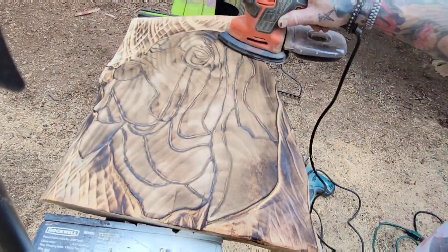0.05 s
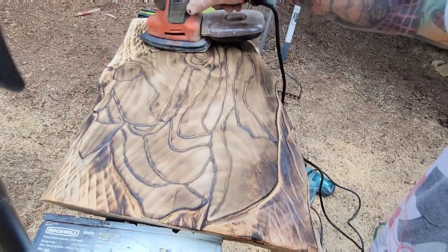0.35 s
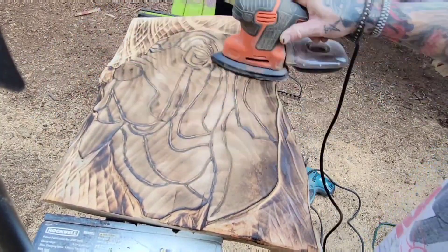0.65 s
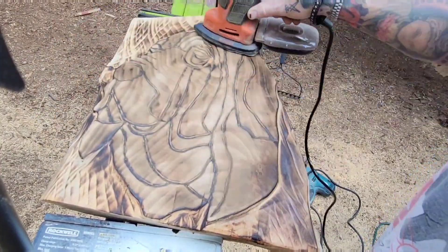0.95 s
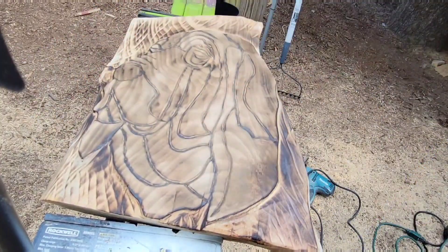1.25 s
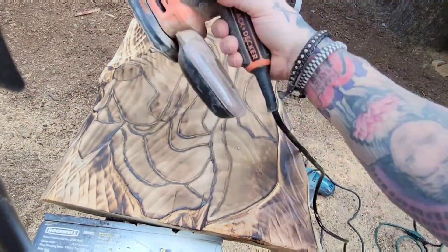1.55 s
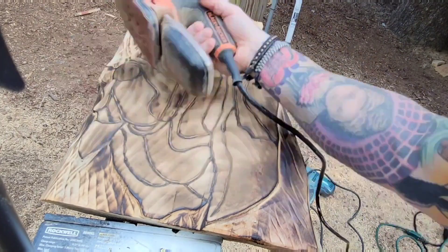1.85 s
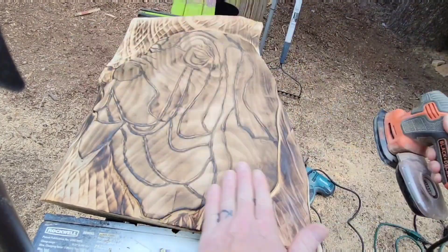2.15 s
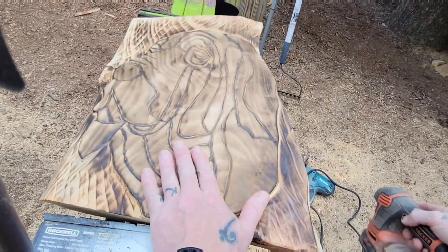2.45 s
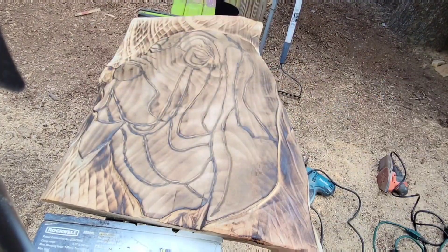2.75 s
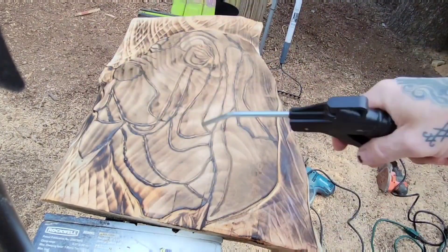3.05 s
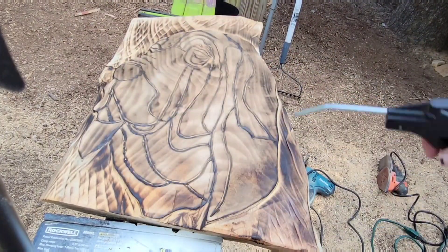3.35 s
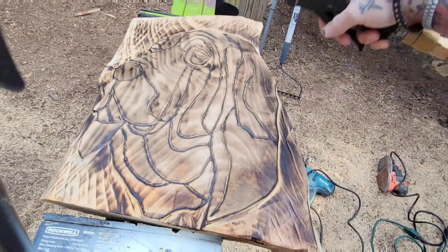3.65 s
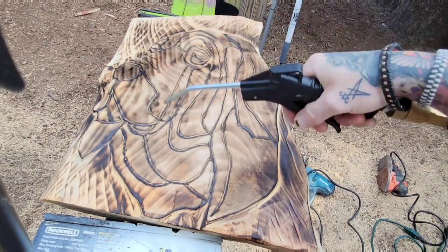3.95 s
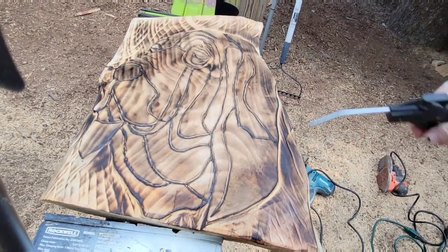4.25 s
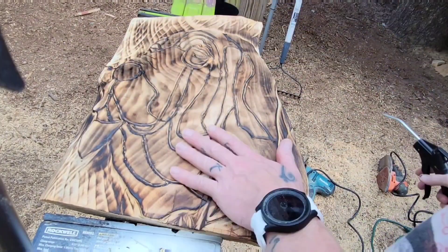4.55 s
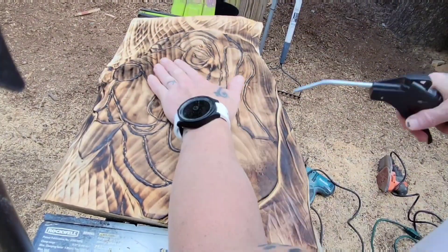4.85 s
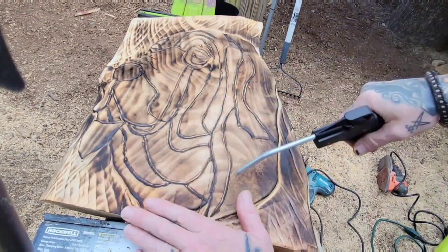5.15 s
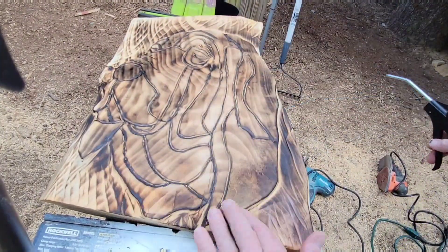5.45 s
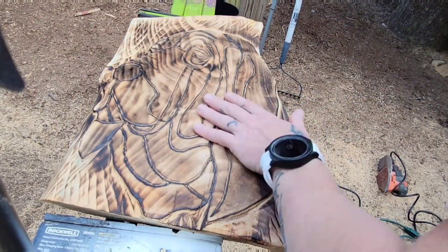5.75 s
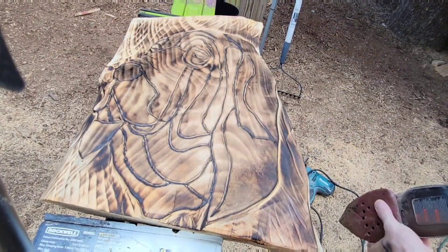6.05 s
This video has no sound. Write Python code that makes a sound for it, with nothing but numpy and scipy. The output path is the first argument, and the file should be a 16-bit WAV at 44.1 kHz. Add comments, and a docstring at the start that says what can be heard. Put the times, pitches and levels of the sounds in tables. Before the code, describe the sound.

Outdoors, a shrill power sander works a wooden slab and switches off, followed by sputtering, hissing bursts from a compressed air gun.

```python
"""Outdoors in a yard, under the hum of a distant machine, a small electric sander works a carved wooden slab.
Its pad rasps, its fan whines, and air whistles over its vents as it turns in the hand. Lifted off, it
speeds up; switched off, it dives in pitch. A palm wipes the wood, then an air gun spits and blows the
dust away, its jet hissing and splashing on the carving. Two squeaks and a few small knocks follow."""
import sys
import numpy as np
from scipy import signal
from scipy.fft import rfft, irfft, next_fast_len
from scipy.io import wavfile

SR = 44100
rng = np.random.default_rng(int(sys.argv[2]) if len(sys.argv) > 2 else 0)


def output_pcm(signal):
    """Save a mono or channel-first signal as 16-bit PCM at the path in sys.argv[1].

    Samples are clipped to [-1, 1] before scaling.
    """
    pcm = np.clip(np.atleast_2d(signal).T, -1, 1) * 32767
    wavfile.write(sys.argv[1], SR, np.round(pcm).astype(np.int16))


N = 268569
TIME = np.arange(N) / SR
LEFT_RIGHT = np.array([[1], [-1]])


def undb(db):
    """Decibels to gain."""
    return 10 ** (np.asarray(db) / 20)


def curves(rows):
    """Automation lanes: each column after the time, joined by straight lines."""
    times, *columns = np.transpose(rows)
    return [np.interp(TIME, times, column) for column in columns]


def swell(middle, length):
    """A smooth rise and fall, half as high at the ends of its length."""
    return .5 ** (abs(2 * (TIME - middle) / length) ** 3)


def pan(db):
    """Left and right gains whose mean is 1; db is left minus right."""
    gains = undb(LEFT_RIGHT * db / 2)
    return gains / gains.mean(axis=0)


def noise(colour, likeness):
    """Stereo noise through an EQ curve; likeness is the correlation of the ears. The mid has rms 1."""
    size = next_fast_len(N)
    hz, db = np.transpose(colour)
    log_hz = np.log(np.fft.rfftfreq(size, 1 / SR) + 1)
    gain = undb(np.interp(log_hz, np.log(hz), db))
    white = rng.standard_normal((2, size))
    mid, side = irfft(rfft(white) * gain, size)[:, :N]
    width = np.sqrt((1 - likeness) / (1 + likeness))
    return (mid + width * LEFT_RIGHT * side) / mid.std()


def drift(rate):
    """Smooth random modulation with a spread near 1 and `rate` new values a second."""
    points = signal.resample_poly(rng.standard_normal(8192), 8, 1)
    return np.interp(TIME * rate * 8, np.arange(len(points)), points)


def stereo_drift(rate):
    """An unrelated drift for each ear."""
    return np.array([drift(rate), drift(rate)])


# partials of the distant machine: f/Hz, level/dB
HUM_PARTIALS = [(224, -76), (447.5, -65.5), (672, -72), (1120, -73), (1571, -75), (1696, -73), (1921, -73),
                (2918, -75.5), (3792, -72), (9480, -82.5), (9954, -77), (11377, -88.5)]
# EQ of the outdoor air: f/Hz, level/dB
YARD_EQ = [(30, -41.5), (140, -37), (200, -16), (400, -5), (550, -2.5), (900, -3.5), (1700, -4.5),
           (2400, -6), (2950, -1), (3400, -11), (3850, -2.5), (4700, -8.5), (5550, -3), (7000, -9.5),
           (11000, -10), (15500, -21)]
# fader ride on hum and air together: t/s, gain/dB
YARD_RIDE = [(0, -3), (2.4, 1), (2.65, 3.5), (2.8, 3.5), (3.08, 2.5), (3.2, -3.5), (4.65, -3), (4.97, 0.5),
             (5.5, -2.5), (5.8, 1)]


def yard():
    """A distant machine hums, wavering slightly, in a bed of soft outdoor noise."""
    hum = 0
    for hz, db in HUM_PARTIALS:
        phase = 2 * np.pi * hz * TIME + 0.37 * drift(rate=6.3) + rng.normal(0, 0.17, (2, 1))
        hum = hum + np.sqrt(2) * undb(db) * np.sin(phase)
    air = noise(YARD_EQ, likeness=.45) * undb(-58.5)
    return (hum + air) * undb(curves(YARD_RIDE)[0]) * pan(db=-3.0)


# light taps: t/s, level/dB, f/Hz, decay/s
KNOCK_HITS = [(5.887, -38.5, 2600, 0.0024), (5.991, -45.5, 533, 0.0067), (5.995, -42.5, 2800, 0.0017)]


def knocks():
    """Tools knock lightly: broadly resonant bursts with a hard attack and a fast decay."""
    out = 0
    for start, db, hz, decay in KNOCK_HITS:
        resonance = signal.iirpeak(hz, Q=1, fs=SR)
        body = rng.standard_normal((2, N))
        for _ in range(2):
            body = signal.lfilter(*resonance, body)
        envelope = (TIME >= start) * np.exp(-abs(TIME - start) / decay)
        out = out + body / body.std() * undb(db) * envelope
    return out


# skin on wood: middle t/s, length/s, f/Hz, glide/(Hz/s), warble depth/Hz, level/dB, octave gain/dB
SKIN_SQUEAKS = [(5.656, 0.069, 1315, 700, 102, -49, -13), (5.737, 0.016, 1185, 5040, -2.5, -48, -1.5)]


def squeaks():
    """Skin sticks and slips: a rough, rising, warbling tone with its octave."""
    warble_period_s = 0.031
    out = 0
    for middle, length, hz, glide, warble_hz, db, octave_db in SKIN_SQUEAKS:
        warble = warble_hz * np.cos(2 * np.pi * (TIME - middle) / warble_period_s)
        pitch = hz + glide * np.clip(TIME - middle, -length, length) + warble
        jitter = 1 + 0.02 * drift(rate=300) + 0.025 * drift(rate=60)
        phase = 2 * np.pi * np.cumsum(pitch * jitter) / SR
        tone = np.sqrt(2) * (np.sin(phase) + undb(octave_db) * np.sin(2 * phase))
        out = out + tone * undb(db + 2 * drift(rate=120)) * swell(middle, length)
    return out * pan(db=-11.0)


# EQ of the palm's dull rub: f/Hz, level/dB
PALM_EQ = [(60, -30), (170, -10.5), (350, 1), (600, 1), (900, -8), (2500, -16.5), (9000, -32)]
# strokes of the palm: middle t/s, length/s, level/dB
PALM_STROKES = [(2.288, 0.24, -48.5), (2.674, 0.37, -57)]


def palm_wipes():
    """A palm drags unevenly over the slab: grainy swells of friction noise."""
    drag = sum(undb(db) * swell(middle, length) for middle, length, db in PALM_STROKES)
    return noise(PALM_EQ, likeness=0.17) * drag * undb(3.6 * drift(rate=91))


def off_the_slab(x):
    """An echo from the wood whose path changes as the nozzle sweeps: a light flanging."""
    lag_s = .0008 * np.exp(.4 * drift(rate=12) + .15 * stereo_drift(rate=12))
    echo = np.array([np.interp(TIME - lag, TIME, side) for lag, side in zip(lag_s, x)])
    return (x + .4 * echo) / np.hypot(1, .4)


# EQs of the bright jet, its splash on the wood, its low buffeting and a spit's thud: f/Hz, level/dB
JET_EQ = [(500, -31), (2000, -12.5), (4000, -0.5), (6500, 0.5), (10000, 2.5), (15000, 2.5)]
SPLASH_EQ = [(600, -24), (1600, 0), (2600, 11), (4200, 5.5), (6000, 3), (12000, -58)]
BUFFET_EQ = [(30, -22), (130, -28), (280, -11.5), (550, 4.5), (900, 4), (1500, 0.5), (2500, -17),
             (6000, -37.5)]
THUD_EQ = [(30, -18), (120, -14), (250, -5.5), (500, 7.5), (900, 0.5), (2800, 2.5), (5000, -3),
           (12000, -14)]
# one fader ride a blast, from valve open to valve shut: t/s, jet/dB, splash/dB, buffet/dB
BLAST_RIDES = [
    [(3.36, -35, -49, -52), (3.45, -35.5, -42.5, -50.5), (3.635, -39, -48.5, -53.5),
     (3.695, -25, -43.5, -61), (3.83, -32, -30, -44.5), (3.87, -33.5, -36.5, -48),
     (4.06, -29.5, -38, -57.5), (4.19, -35, -35.5, -45.5), (4.275, -38, -44.5, -47),
     (4.33, -36.5, -39, -47), (4.495, -35, -47.5, -54), (4.515, -29, -40.5, -53), (4.619, -33.5, -45, -54)],
    [(4.996, -29, -62, -56), (5.075, -37, -57, -61.5), (5.115, -33, -37.5, -56), (5.215, -29, -39, -53.5),
     (5.285, -38, -43.5, -52), (5.47, -35.5, -54, -55.5)],
]
# short spits of the jet: middle t/s, length/s, hiss/dB, thud/dB
JET_SPITS = [(3.11, 0.013, -35.5, -44.5), (3.162, 0.004, -43.5, -61), (3.187, 0.01, -31, -30),
             (3.231, 0.0072, -36, -45), (3.257, 0.014, -29, -29.5), (3.302, 0.03, -41.5, -55),
             (3.326, 0.015, -27.5, -31.5), (3.446, 0.0088, -27.5, -45), (3.477, 0.0076, -29, -60),
             (3.513, 0.0087, -27.5, -43.5), (3.566, 0.008, -29, -57), (3.81, 0.018, -26.5, -54),
             (3.838, 0.01, -30.5, -30.5), (4.297, 0.011, -26.5, -27.5), (4.509, 0.011, -33, -63),
             (5.026, 0.0069, -35, -55), (5.38, 0.0045, -35, -60)]


def air_gun():
    """The nozzle hisses; where the jet hits the carving it splashes, buffets and spits in the grooves."""
    jet = noise(JET_EQ, likeness=0.09)
    splash = off_the_slab(noise(SPLASH_EQ, likeness=0.38))
    buffet = off_the_slab(noise(BUFFET_EQ, likeness=0.36))
    thud = noise(THUD_EQ, likeness=0.095)
    out = 0
    for ride in BLAST_RIDES:
        opens, closes = ride[0][0], ride[-1][0]
        jet_db, splash_db, buffet_db = curves(ride)
        valve = np.clip((TIME - opens) / 0.0072, 0, 1) * np.exp(-np.maximum(TIME - closes, 0) / 0.0022)
        eddies = drift(rate=90) + .5 * drift(rate=1200)
        highs = jet * undb(jet_db - 1.75 + 1.95 * eddies)
        mids = splash * undb(splash_db - 2.0 + 1.7 * eddies)
        lows = buffet * undb(buffet_db - 1.0 + 2.85 * eddies + 2.0 * drift(rate=150))
        out = out + valve * (highs + mids + lows)
    for middle, length, hiss_db, thud_db in JET_SPITS:
        out = out + swell(middle, length) * (jet * undb(hiss_db) + thud * undb(thud_db))
    return out * pan(db=-1.5)


LIFT_S, OFF_S = (1.3, 1.5), 2.488  # the sander leaves the wood over this span; it is switched off


def on_wood():
    """1 while the pad lies on the slab, 0 once it is lifted."""
    return np.interp(TIME, LIFT_S, [1, 0])


def whistle_pan(turn_db, side_db):
    """The shrill layers sit far to one side on the wood; in the air they follow the turning tool."""
    return pan(turn_db + side_db * on_wood())


# EQ of the pad on the wood: f/Hz, level/dB
PAD_EQ = [(150, -34), (450, -9), (650, -3.5), (820, -4.5), (950, 1.5), (1150, -0.5), (1500, 1), (2200, -1),
          (5000, -10)]


def pad_rasp(phase, load):
    """The pad rasps, biting harder at first; the loaded rotor sings faintly at half the blade rate."""
    rasp = noise(PAD_EQ, likeness=.55) * undb(1.5 * drift(rate=100))
    undertone = .25 * np.sin(phase / 2 + .8 * drift(rate=45)) * undb(3 * drift(rate=10))
    bite_db = 6.5 * np.exp(-TIME / 0.12)
    return (rasp + undertone) * on_wood() * undb(-46.5 + bite_db + 2.3 * load)


# EQ of the air through the housing: f/Hz, level/dB
RUSH_EQ = [(30, -37), (120, -41), (300, -43.5), (500, -22), (1050, -13.5), (1600, -5), (2300, -9.5),
           (2800, 3.5), (3450, -5), (4500, 6), (6600, 7), (8000, 7), (9800, 10), (12000, 3.5), (15500, 1)]
# fader rides for the next three layers as the tool turns in the hand:
# t/s, blade tone/dB, fifth harmonic/dB, air rush/dB, vent whistle/dB, pan/dB
TURN_RIDES = [(0, -23.5, -31.5, -27.5, -32.5, -1), (0.3, -23, -20.5, -30.5, -31.5, -1),
              (0.85, -22.5, -33, -29, -31, -2.5), (0.92, -27.5, -32, -27.5, -32, -4),
              (1.0, -23.5, -27.5, -28.5, -28.5, -0.5), (1.32, -22.5, -27.5, -31.5, -27.5, -2.5),
              (1.46, -26, -42.5, -39, -29.5, -1), (1.53, -27, -25.5, -28.5, -32, -5),
              (1.63, -24, -25.5, -25, -25, -3), (1.68, -20.5, -21.5, -29, -26.5, 0),
              (1.79, -21.5, -34.5, -29.5, -21.5, 0), (1.89, -20.5, -23.5, -30, -21.5, -1.5),
              (1.99, -21, -27.5, -29.5, -19.5, 0), (2.09, -21.5, -32.5, -32, -23, -6),
              (2.16, -27, -42, -38.5, -36, -1), (2.25, -26.5, -27.5, -33, -26, -4.5),
              (2.46, -22, -28, -31.5, -28, -7)]


def fan_rush(phase):
    """Each blade pushes out its own puff, so the rush of air pulses with the whine."""
    _, _, rush_db, _, turn_db = curves(TURN_RIDES)
    chop = (1 + .2 * np.sin(phase) + .07 * np.sin(2 * phase)) * undb(.8 * drift(rate=120))
    return noise(RUSH_EQ, likeness=0.1) * chop * undb(rush_db + 2.0) * pan(turn_db)


# shrill flares: middle t/s, length/s, third harmonic gain/dB, vent whistle gain/dB
VENT_FLARES = [(0.33, 0.4, 9.5, 2), (0.53, 0.096, 12.5, 6), (0.695, 0.079, 15.5, 8.5), (0.89, 0.031, 0, 9),
               (1.204, 0.11, 12, -2.5), (1.41, 0.061, 11.5, 2), (1.59, 0.044, 9, -5),
               (2.21, 0.15, 11, -6.5), (2.497, 0.025, 22, 6)]


def flares():
    """When the vents face the slab, the third harmonic and the whistle shift by these two dB curves."""
    return sum(np.outer([third_db, vent_db], .5 ** ((2 * (TIME - middle) / length) ** 2))
               for middle, length, third_db, vent_db in VENT_FLARES)


def vent_whistle():
    """Air tumbling over the vent slots sings in a rough narrow band, higher with the faster fan."""
    _, _, _, vent_db, turn_db = curves(TURN_RIDES)
    _, flare_db = flares()
    hz = np.interp(TIME, LIFT_S, [5920, 6050])
    likeness, left_lead_rad = 0.67, 1.88
    eddies = rng.standard_normal((3, N)) + 1j * rng.standard_normal((3, N))
    eddies = signal.sosfilt(signal.butter(2, 260, fs=SR, output="sos"), eddies)
    common = eddies[0] * np.exp(.5j * left_lead_rad * LEFT_RIGHT)
    ears = np.sqrt(likeness) * common + np.sqrt(1 - likeness) * eddies[1:]
    band = np.real(ears * np.exp(2j * np.pi * np.cumsum(hz) / SR))
    return band / band.std() * undb(vent_db + 4.0 + flare_db) * whistle_pan(turn_db, side_db=-14.5)


# blade harmonics 1 to 7: gain on wood/dB, gain running free/dB, pan/dB, left lead/rad, waver/dB
BLADE_HARMONICS = [(2, 0.26, -3.5, -0.48, 1.26), (-17.5, -17.5, -16, -0.4, 4), (-1.5, 0.5, -12.5, 2, 2.5),
                   (-12.5, -11, -6.5, 1.76, 3.5), (2.5, -0.5, -5, -0.56, 2.03), (-15, -27, 0, -0.79, 2.5),
                   (-16, -24.5, -1, 1.2, 2)]
# resonances of the housing, which the slowing harmonics slide through: f/Hz, level/dB
HOUSING_EQ = [(2500, -13.5), (3300, -19), (4200, -5), (5800, -14.5), (7000, -3.5), (9500, -7),
              (11000, -13.5), (14000, -27)]


def fan_whine(hz, phase):
    """Fan blades chop the air; reflections from the slab make every harmonic waver."""
    tone_db, fifth_db, _, vent_db, turn_db = curves(TURN_RIDES)
    flare_db, _ = flares()
    # the third rides with the whistle; on the wood its flares duck the fifth
    own_rides = {3: vent_db - 0.5 + flare_db, 5: fifth_db - 0.75 * flare_db * on_wood()}
    since_off = np.maximum(TIME - OFF_S, 0)
    fade_out = np.clip((2.64 - TIME) / 0.086, 0, 1)
    coast_db = np.interp(TIME, [2.485, 2.52, 2.55, 2.585, 2.64], [-90, -36, -32, -43, -90])
    out = 0
    for k, (loaded_db, free_db, pan_db, lead, waver_db) in enumerate(BLADE_HARMONICS, 1):
        db = own_rides.get(k, tone_db) + np.interp(TIME, LIFT_S, [loaded_db, free_db])
        driven = undb(db - since_off * (300 if k == 1 else 520)) * fade_out
        coasting = undb(coast_db + np.interp(k * hz, *np.transpose(HOUSING_EQ)))
        waver = undb(waver_db * (stereo_drift(rate=20) + 0.76 * stereo_drift(rate=110)))
        # the phase between the ears wavers more for shorter waves
        ear_phase = lead / 2 * LEFT_RIGHT + 0.091 * (k - 1) * stereo_drift(rate=29)
        place = whistle_pan(turn_db, pan_db) if k == 3 else pan(pan_db)
        out = out + np.sqrt(2) * np.sin(k * phase + ear_phase) * (driven + coasting) * waver * place
    return out


# pitch curve of the fan's blade rate, rising as the sander is lifted: t/s, f/Hz
BLADE_RATE = [(0, 1866), (0.3, 1886), (0.8, 1886), (1.21, 1876), (1.28, 1923), (1.34, 1919), (1.41, 2015),
              (1.5, 2042), (1.95, 2052), (2.48, 2031)]


def sander():
    """One motor drives fan and pad: quick strokes load it; switched off, friction brakes it steadily."""
    stroke_s, press_at_s, strokes_end_s = 0.158, 0.0968, 0.92
    swing_hz, brake_hz_per_s = 9.9, 10100
    stroking = np.clip((strokes_end_s - TIME) / stroke_s * 2, 0, 1)
    load = np.cos(2 * np.pi * (TIME - press_at_s) / stroke_s) * stroking
    powered_hz = curves(BLADE_RATE)[0] - swing_hz * load
    hz = np.maximum(powered_hz - brake_hz_per_s * np.maximum(TIME - OFF_S, 0), 100)
    flow = hz / powered_hz  # the air flow falls as the rotor brakes
    hz = hz * (1 + 0.0014 * drift(rate=180))
    phase = 2 * np.pi * np.cumsum(hz) / SR
    rush = flow * fan_rush(phase)
    rasp = pad_rasp(phase, load)
    whine = fan_whine(hz, phase)
    whistle = flow ** 2 * vent_whistle()
    fade_out = np.clip((2.69 - TIME) / 0.058, 0, 1)
    return whine + rasp + fade_out * (rush + whistle)


def scene():
    """The full mix, in open air."""
    return sander() + air_gun() + palm_wipes() + squeaks() + knocks() + yard()


def record(dry):
    """A steep low-pass cuts the very top."""
    top_hz = 15650
    return signal.sosfilt(signal.ellip(10, .2, 80, top_hz, fs=SR, output="sos"), dry)


dry = scene()
out = record(dry)
output_pcm(out)
```